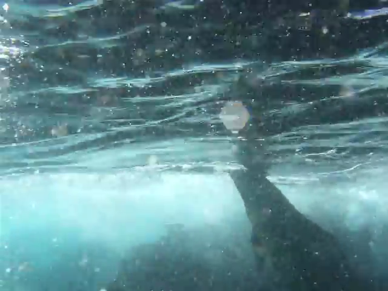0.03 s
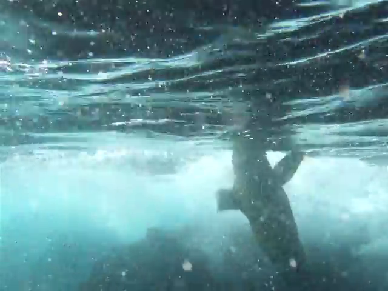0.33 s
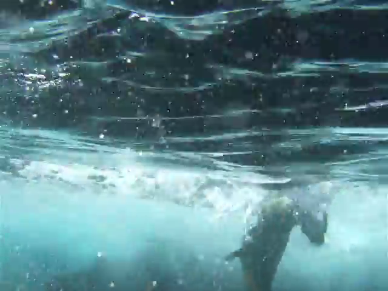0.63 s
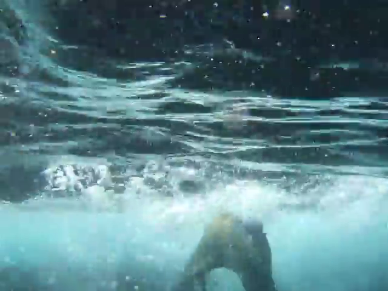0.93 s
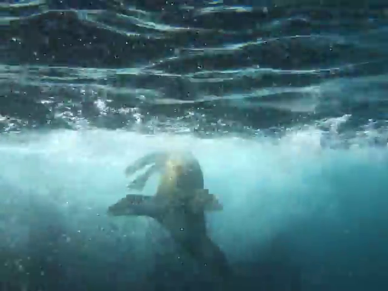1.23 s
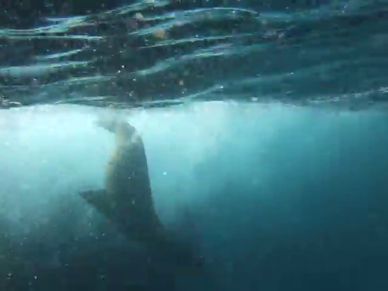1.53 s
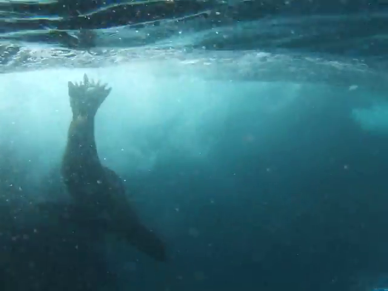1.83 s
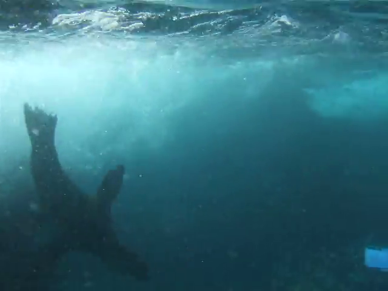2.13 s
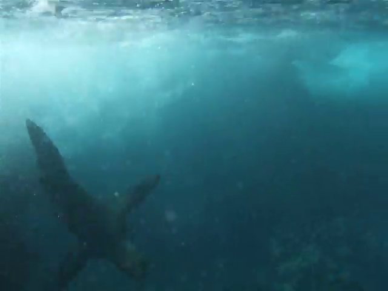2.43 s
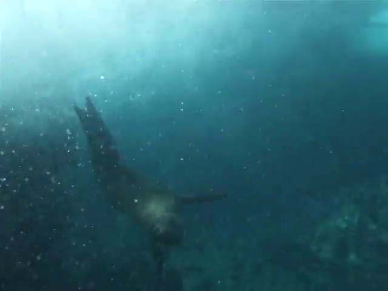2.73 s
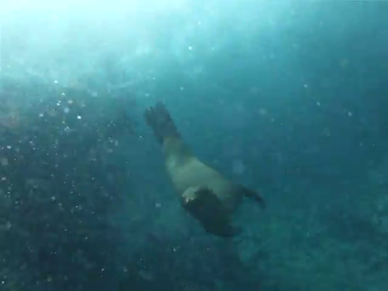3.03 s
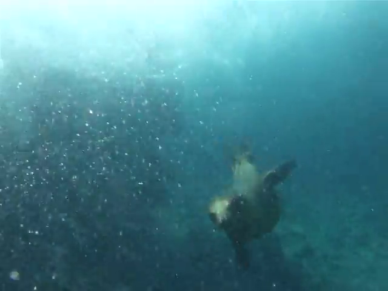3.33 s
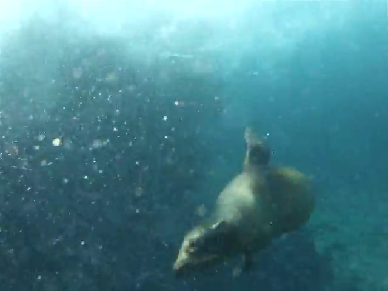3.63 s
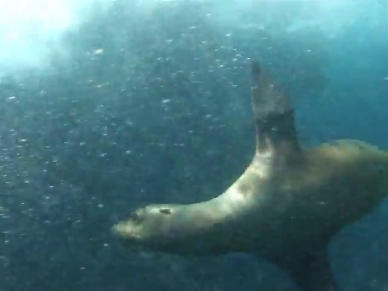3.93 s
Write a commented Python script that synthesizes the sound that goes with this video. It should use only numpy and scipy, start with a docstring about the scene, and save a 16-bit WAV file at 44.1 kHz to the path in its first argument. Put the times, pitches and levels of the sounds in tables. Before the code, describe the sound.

Water gurgling underwater, with constant crackling of snapping shrimp, bubble plops and soft knocks.

```python
"""Under water by a rocky shore, heard inside a camera housing. From the start: distant surf, chop
gurgling through the hollow case, and snapping shrimp, each snap ringing the case for a few ms.
At 0.6-0.9 s a cluster of bubbles plops, opening with two soft knocks on the case. A faint knock and
three low plops follow, then a second cluster at 2.0-2.2 s and knocks with plops at 2.6 and 3.0 s.
The loudest knock and bubble land at 3.5 s, two lighter knocks after; the shrimp crackle on."""
import sys
import numpy as np
from scipy import signal
from scipy.fft import rfft, irfft
from scipy.io import wavfile
from scipy.ndimage import uniform_filter1d

SR = 44100
rng = np.random.default_rng(int(sys.argv[2]) if len(sys.argv) > 2 else 0)


def persist_wave(psi):
    """Save psi, clipped to +-1, as 16-bit WAV."""
    counts = np.round(np.clip(psi, -1, 1) * 32767).astype(np.int16)
    wavfile.write(sys.argv[1], SR, np.atleast_2d(counts).T)


N = 176400
SNAP_SAMPLES = 1024

# wash spectrum: freq_hz, relative_density_db
WASH_SPECTRUM = [(20, 3.5), (32, -4.5), (50, -13), (120, -11.5), (200, -11.5), (280, -13), (450, -16.5),
                 (680, -13.5), (1250, -17.5), (1520, -18.5), (2000, -19.5), (2720, -17.5), (3500, -19),
                 (4400, -18), (5500, -20.5), (6400, -21.5), (7250, -18.5), (8200, -23), (9000, -31)]
# air resonances in the case: freq_hz, width_hz, gain_db
AIR_MODES = [(200, 96, -11.5), (375, 86, -1.5), (442, 72.4, 1.5), (562.4, 158, -11.5)]
# gurgle envelope: time_s, level_db
GURGLE_ENVELOPE = [(0, -50.5), (.2, -53), (.42, -48.5), (0.799, -46.5), (.97, -55.5), (1.18, -46),
                   (1.3, -45.5), (1.5, -48), (1.75, -52.5), (1.95, -50), (2.3, -49.5), (2.55, -48),
                   (2.95, -46.5), (3.18, -52), (3.45, -46.5), (3.7, -49), (4, -49.5)]
# blows on the case: start_s, hollow_db, thud_hz, thud_db, wall_db
CASE_KNOCKS = [(0.628, -30, 200, -54, -52), (0.64, -32.5, 210, -36, -41), (1.030, -38.5, 190, -44, -68),
               (2.571, -33, 152, -39.5, -65), (3.022, -32, 220, -59, -53), (3.5402, -18, 264, -28, -32.5),
               (3.649, -36, 123, -33.5, -34.5), (3.7572, -31, 225, -36, -50)]
# bubbles: start_s, pitch_hz, level_db, decay_s, start_detune_ratio
BUBBLE_PLOPS = [(0.629, 1136, -32.5, 0.0065, -0.0015), (.6415, 1350, -33, 0.0037, -0.018),
                (.642, 2040, -40, 0.009, 0.002), (.650, 882, -40, 0.017, -0.062),
                (.676, 769, -36.5, 0.027, 0.073), (.720, 751, -34, 0.016, 0.095),
                (.720, 1136, -43, 0.015, 0.059), (.779, 965, -44, 0.0078, 0.029),
                (.786, 1930, -40, 0.0073, 0.01), (.786, 2220, -39, .004, -0.035),
                (0.803, 1510, -38.5, 0.0046, 0.0067), (.862, 450, -32, 0.014, 0.054),
                (1.270, 375, -38, 0.011, 0.015), (1.304, 375, -34.5, 0.014, -0.05),
                (1.464, 380, -37, 0.013, 0.029), (2.045, 385.5, -29.5, 0.015, 0.015),
                (2.089, 1480, -33.5, 0.0054, -0.016), (2.093, 980, -45.5, 0.023, 0.013),
                (2.117, 495, -33.5, 0.012, 0.0018), (2.113, 1860, -41, 0.0036, 0.049),
                (2.113, 1574, -44, 0.013, -0.049), (2.128, 860, -38.5, 0.0082, -0.014),
                (2.138, 537, -30.5, 0.0091, 0.0067), (2.143, 710, -35.5, 0.012, 0.06),
                (2.1525, 447, -24, 0.02, 0.037), (2.1814, 450.7, -25, 0.018, -0.029),
                (2.572, 408, -33.5, 0.0069, 0.025), (2.989, 406, -39, 0.028, 0.15),
                (3.022, 161, -32.5, 0.011, -0.15), (3.5403, 710, -20.5, 0.014, 0.23)]
# case modes, three per band (low, main, upper, high, top): freq_hz, width_hz, gain_db
CASE_MODES = [(830, 630, -9), (1556, 240, 0), (1790, 220, -8), (2116, 290, 0.5), (2492, 640, -1),
              (2762, 380, 4.5), (3303, 660, 2.5), (3870, 590, -2.5), (4330, 470, 0), (4820, 700, -1),
              (5560, 1100, -2), (6335, 970, 0), (7140, 710, 5.5), (7480, 900, -5), (7880, 2900, -6)]
# mean band gains of a far snap: low_db, main_db, upper_db, high_db, top_db
FAR_SNAP_BANDS_DB = [-9.5, 0, -1.5, -6.5, 0]
# near snaps: start_s, low_db, main_db, upper_db, high_db, top_db
NEAR_SNAPS = [(0.099, -67, -49, -42, -44, -58), (0.1534, -47, -34, -35.5, -54, -51),
              (0.2288, -66, -43, -54, -45.5, -44), (0.2599, -42.5, -28.5, -32, -47, -40),
              (0.3403, -62, -47, -42, -44, -40), (0.401, -52, -36.5, -33, -57, -45),
              (0.4484, -51, -43, -54, -49, -41.5), (0.4774, -44, -34, -43.5, -42, -42.5),
              (0.6327, -46, -43, -46, -59, -46), (0.642, -56, -51, -58, -65, -57),
              (0.6551, -44, -31, -31.5, -43, -46), (0.6847, -66, -50, -41, -56, -62),
              (0.7205, -57, -42.5, -55, -62, -65), (0.8035, -46, -38.5, -46, -43.5, -45),
              (1.0243, -70, -55, -47, -46.5, -52), (1.118, -61, -47, -51, -49, -42.5),
              (1.228, -64, -54, -41, -64, -64), (1.2605, -57, -42.5, -40, -64, -50),
              (1.297, -56, -39, -37, -53, -36.5), (1.329, -57, -44, -41, -62, -64),
              (1.374, -55, -41, -42.5, -60, -53), (1.5372, -64, -43, -66, -41.5, -44.5),
              (1.6739, -62, -42.5, -45.5, -64, -56), (1.7642, -59, -47, -44, -53, -42),
              (1.7693, -53, -35, -44, -52, -45), (1.7814, -63, -59, -49, -53, -39),
              (1.8095, -54, -51, -40, -49, -50), (1.8911, -62, -53, -38.5, -51, -51),
              (1.8998, -55, -45.5, -44, -58, -42.5), (1.9545, -50.5, -37, -33.5, -54, -47),
              (1.9897, -65, -42.5, -50, -58, -47), (2.045, -59, -43, -40.5, -47, -50),
              (2.0864, -41, -45, -33.5, -46, -60), (2.2305, -56, -64, -59, -54, -42.5),
              (2.2952, -62, -39.5, -39, -57, -36.5), (2.3007, -42.5, -34, -39, -44, -46),
              (2.4275, -59, -41.5, -50, -63, -69), (2.47, -56, -46.5, -48, -65, -65),
              (2.4909, -48, -42.5, -41, -60, -59), (2.53, -48.5, -37.5, -33.5, -53, -36.5),
              (2.7435, -48, -41.5, -41, -37, -42), (2.8744, -48, -37.5, -43.5, -57, -53),
              (2.9098, -50, -36, -43.5, -58, -56), (2.9347, -51, -42, -56, -53, -57),
              (3.041, -55, -41, -46, -58, -49), (3.0545, -44, -31, -35, -61, -56),
              (3.065, -49, -48, -41, -55, -52), (3.1136, -52, -32, -38, -52, -49),
              (3.173, -51, -37.5, -48, -50, -49), (3.1863, -65, -54, -34, -45, -57),
              (3.2105, -57, -34, -45, -54, -47), (3.2325, -68, -57, -58, -55, -43.5),
              (3.4266, -53, -43, -45, -40, -62), (3.5165, -52, -36, -36, -36, -38),
              (3.5419, -37, -32.5, -41.5, -50, -37), (3.6829, -63, -38.5, -61, -59, -47.5),
              (3.7273, -51, -46, -41, -45, -41), (3.7548, -54, -28.5, -36, -38.5, -51),
              (3.79, -56, -44.5, -45, -55, -50), (3.8873, -63, -56, -36.5, -51, -48),
              (3.9182, -57, -40, -35.5, -51, -44), (3.963, -51, -39, -43, -55, -45),
              (3.9854, -63, -58, -46, -50, -44)]


def undb(db):
    return 10 ** (np.asarray(db) / 20)


def set_rms(x, db):
    return x * undb(db) / np.sqrt(np.mean(x ** 2))


def add(out, start_s, x):
    i = max(int(start_s * SR), 0)
    out[i:i + len(x)] += x[:max(N - i, 0)]


def resonance(samples, freq_hz, width_hz):
    """Spectrum of one band-pass resonance applied twice."""
    bins_hz = np.fft.rfftfreq(samples, 1 / SR) + 1e-6
    return (1 + 1j * (bins_hz / freq_hz - freq_hz / bins_hz) * freq_hz / width_hz) ** -2


def waver(rate_hz):
    """Random steps, smoothed twice; spread near 1."""
    hold = int(SR / rate_hz)
    steps = np.repeat(rng.standard_normal(N // hold + 1), hold)
    return 1.3 * uniform_filter1d(uniform_filter1d(steps, hold), hold)[:N]


def patter(rate_per_s, spread_db, range_db):
    """Random impulses: start_s, signed gain. Mostly weak if spread_db > 0, else mostly strong."""
    when, size, sign = rng.random((4000, 3))[:int(rate_per_s * N / SR)].T
    gain_db = -spread_db * np.log(1 - size * (1 - np.exp(-range_db / spread_db)))
    return when * N / SR, undb(gain_db) * np.sign(sign - 0.5)


def ring(pitch_hz, peak_db, decay_s, detune=0, rise_cycles=1.1, settle_s=0.009):
    """Damped tone; starts sharp (detune > 0) or flat and settles on its pitch."""
    t = np.arange(SR // 5) / SR
    cycles = pitch_hz * (t + detune * settle_s * (1 - np.exp(-t / settle_s)))
    envelope = (1 - np.exp(-(t * pitch_hz / rise_cycles) ** 2)) * np.exp(-t / decay_s)
    return undb(peak_db) * envelope / envelope.max() * np.sin(2 * np.pi * cycles)


def wash(level_db=-51, waver_db=1.24):
    """Distant surf and merged crackle: shaped noise, gently wavering."""
    freq_hz, density_db = np.transpose(WASH_SPECTRUM)
    bins_hz = np.fft.rfftfreq(N, 1 / SR)
    colour = undb(np.interp(np.log(bins_hz + 1), np.log(freq_hz), density_db))
    noise = irfft(rfft(rng.standard_normal(N)) * colour, N)
    return set_rms(noise, level_db) * undb(waver_db * waver(rate_hz=18))


def gurgle():
    """Small slaps of the chop ring the air in the case, swelling with the waves."""
    hollow = sum(undb(gain_db) * resonance(4096, freq_hz, width_hz) * 1j ** k  # 90 deg per mode
                 for k, (freq_hz, width_hz, gain_db) in enumerate(AIR_MODES))
    starts_s, gains = patter(rate_per_s=330, spread_db=-1.5, range_db=7)
    slaps = np.bincount((starts_s * SR).astype(int), gains, N)
    ringing = signal.oaconvolve(slaps, irfft(hollow))[:N]
    envelope_db = np.interp(np.arange(N) / SR, *np.transpose(GURGLE_ENVELOPE))
    return set_rms(ringing, 0) * undb(envelope_db)


def knocks(hollow_hz=439, wall_hz=980):
    """Soft blows on the case: hollow ring, thud and wall ring."""
    out = np.zeros(N)
    for start_s, hollow_db, thud_hz, thud_db, wall_db in CASE_KNOCKS:
        parts = (hollow_hz, hollow_db, 0.004), (thud_hz, thud_db, 0.0034), (wall_hz, wall_db, 0.0055)
        for pitch_hz, peak_db, decay_s in parts:
            add(out, start_s, ring(pitch_hz, peak_db, decay_s, rise_cycles=0.79))
    return out


def bubbles(trim_db=-1, froth_count=3, max_lag_s=0.05, max_rise_octaves=0.88):
    """Air pockets pinch off and ring; each sheds a faint froth of smaller, higher ones."""
    out = np.zeros(N)
    for start_s, pitch_hz, level_db, decay_s, detune in BUBBLE_PLOPS:
        add(out, start_s, ring(pitch_hz, level_db + trim_db, decay_s, detune))
        for lag, rise in rng.random((froth_count, 2)):
            froth_hz = pitch_hz * 2 ** (rise * max_rise_octaves)
            froth = ring(froth_hz, peak_db=-54.5, decay_s=0.0068, detune=detune)
            add(out, start_s + lag * max_lag_s, froth)
    return out


def snap(bands_db, close_db=-4, close_s=0.00074, tail_db=-5.5, tail_s=0.0042, rms_span_s=0.0053):
    """A crack rings the case: direct, by close paths, and as a tail off rock and surface."""
    t = np.arange(SNAP_SAMPLES) / SR
    paths = rng.standard_normal((2, SNAP_SAMPLES)) * np.exp(-t / np.array([[close_s], [tail_s]]))
    path_gains = undb([close_db, tail_db]) / np.linalg.norm(paths, axis=1)
    drive = rfft((t == 0) + path_gains @ paths)
    freq_hz, width_hz, gain_db = np.transpose(CASE_MODES)[:, :, None]
    # each direction favours other modes
    size, detune, sign = rng.standard_normal((3, len(CASE_MODES), 1))
    mode_gains = undb(gain_db + 3 * size) * np.sign(sign)
    modes = mode_gains * resonance(SNAP_SAMPLES, freq_hz * (1 + 0.018 * detune), width_hz)
    band_responses = modes.reshape(len(bands_db), -1, len(drive)).sum(axis=1)
    bands = irfft(band_responses * drive)
    band_gains = undb(bands_db) / np.linalg.norm(bands, axis=1)
    return band_gains @ bands * np.sqrt(rms_span_s * SR)


def far_shrimp(animals=40, colour_spread_db=4, gain_db=-65):
    """The distant colony: each animal snaps at random with its own colour."""
    out = np.zeros(N)
    colours_db = colour_spread_db * rng.standard_normal((animals, len(FAR_SNAP_BANDS_DB)))
    voices = [snap(colour_db + FAR_SNAP_BANDS_DB) for colour_db in colours_db]
    starts_s, gains = patter(rate_per_s=240, spread_db=6.5, range_db=13)
    for k, (start_s, gain) in enumerate(zip(starts_s, gains)):
        add(out, start_s, gain * voices[k % animals])
    return out * undb(gain_db)


def near_shrimp(trim_db=0.11):
    """Single loud snaps from the rocks close by."""
    out = np.zeros(N)
    for start_s, *bands_db in NEAR_SNAPS:
        add(out, start_s, snap(bands_db))
    return out * undb(trim_db)


def scene():
    return (near_shrimp() + far_shrimp() + bubbles() + knocks() + gurgle() + wash())[None]


def record(dry):
    """The camera drops the slowest swell and cuts the top."""
    low_hz, top_hz = 22, 8250
    highpassed = signal.sosfilt(signal.butter(2, low_hz, "high", fs=SR, output="sos"), dry)
    return signal.sosfilt(signal.butter(24, top_hz, fs=SR, output="sos"), highpassed)


dry = scene()
out = record(dry)
persist_wave(out)
```